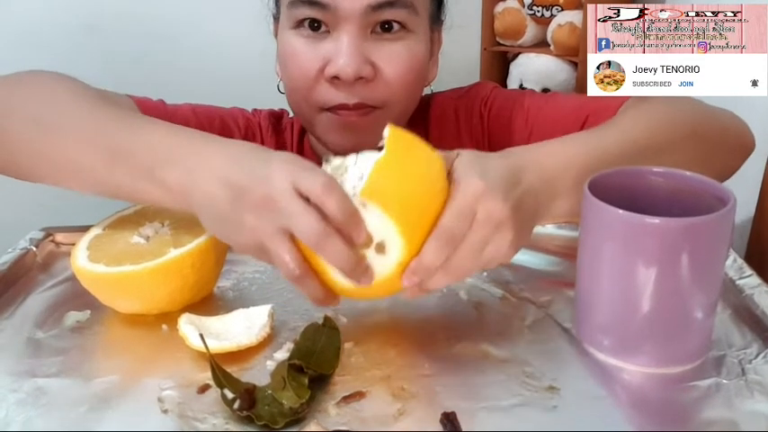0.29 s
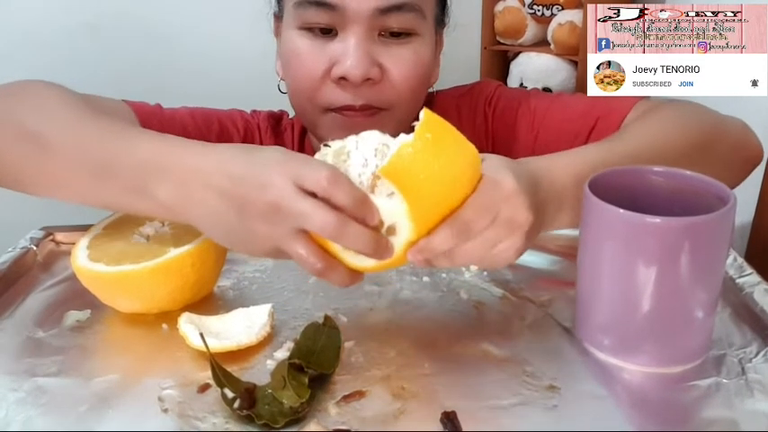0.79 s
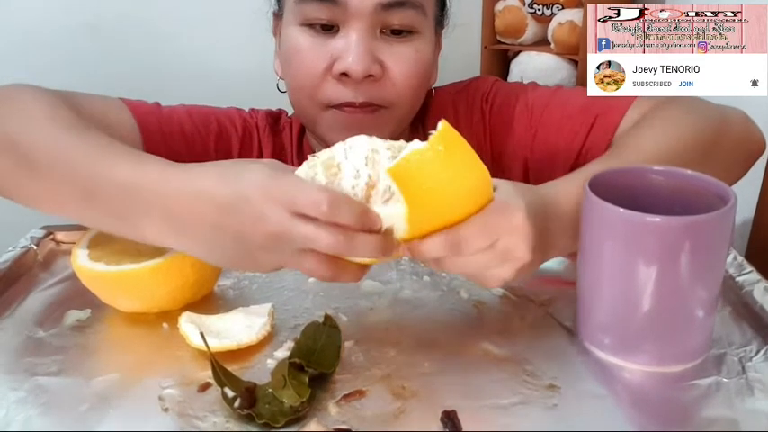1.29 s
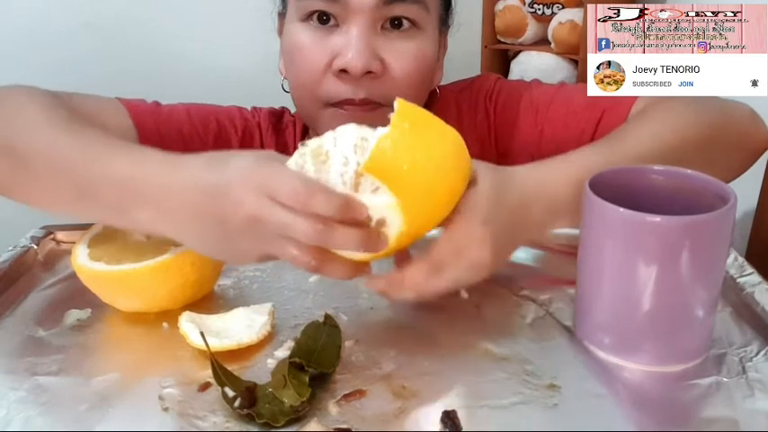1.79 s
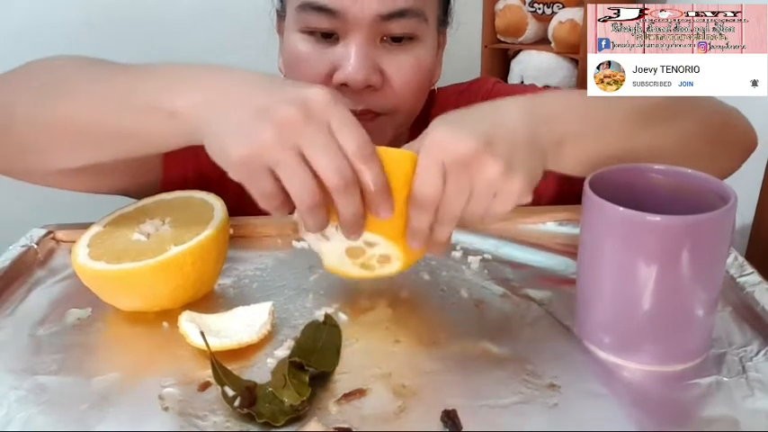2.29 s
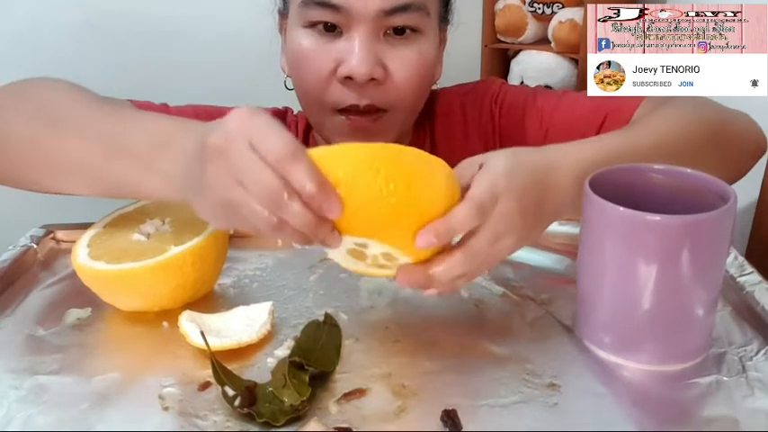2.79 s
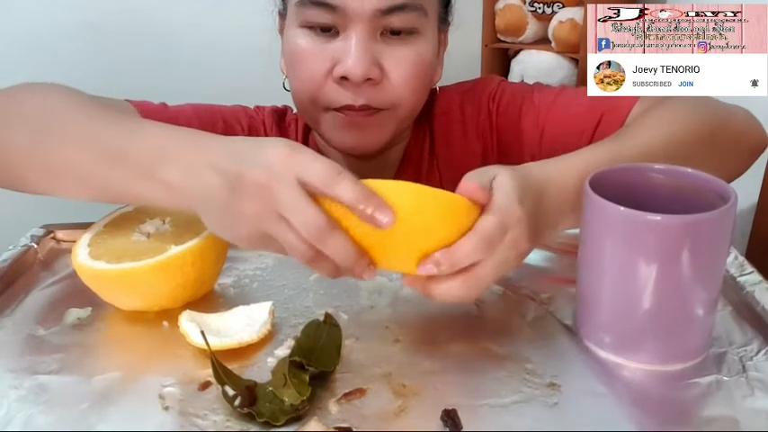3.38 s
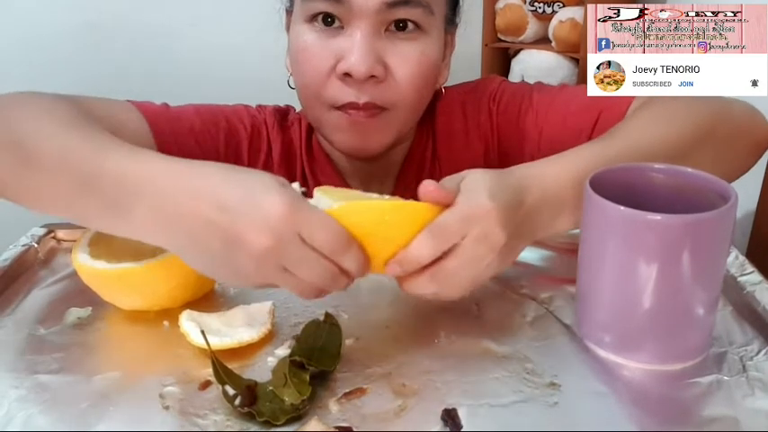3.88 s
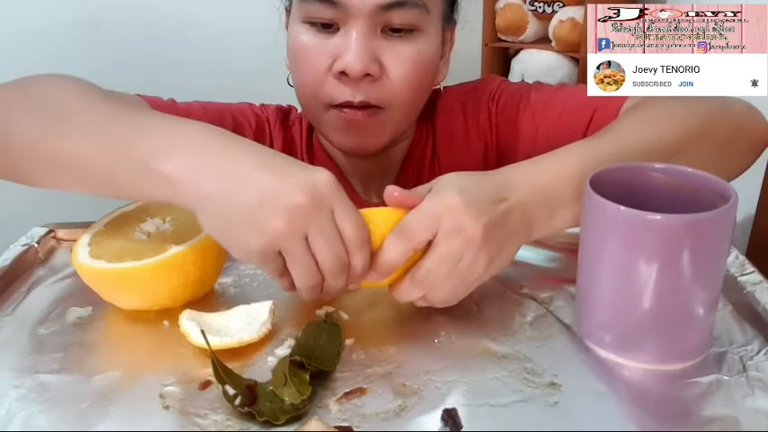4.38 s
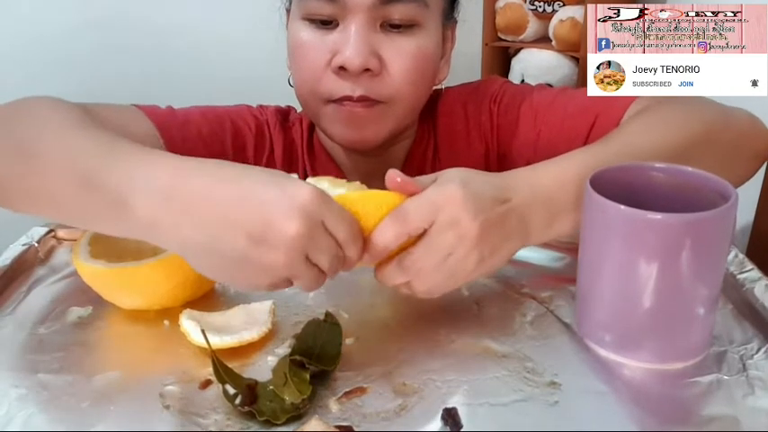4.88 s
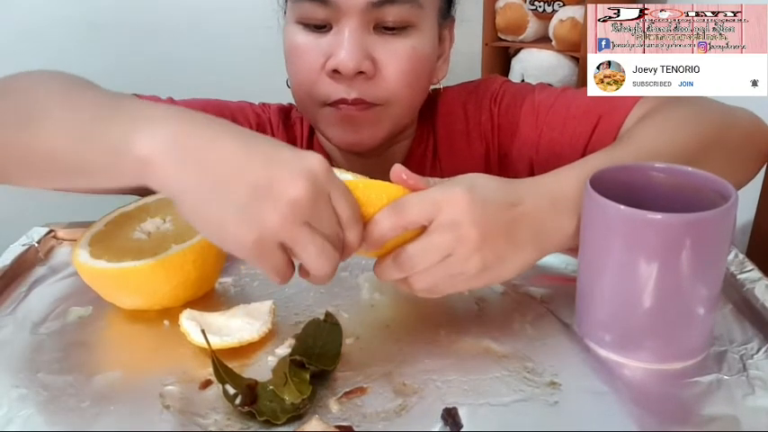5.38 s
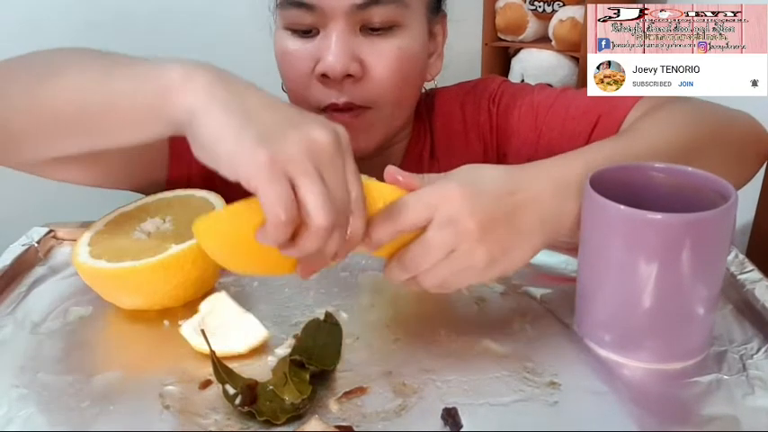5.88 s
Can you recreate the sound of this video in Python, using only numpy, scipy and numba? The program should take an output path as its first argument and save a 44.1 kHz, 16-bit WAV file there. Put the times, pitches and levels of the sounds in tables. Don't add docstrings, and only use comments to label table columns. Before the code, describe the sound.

Thick citrus peel is ripped apart by hand close up, with sharp dry cracks, gritty tearing crackles and a heavy double thump on a tray.

```python
import sys
import numpy as np
from scipy import signal
from scipy.fft import rfft, irfft
from scipy.io import wavfile
from scipy.ndimage import uniform_filter1d
from numba import njit

SR = 44100
rng = np.random.default_rng(int(sys.argv[2]) if len(sys.argv) > 2 else 0)


def transcribe(signal):
    frames = np.atleast_2d(signal).T
    limited = np.clip(frames, -1, 1)
    pcm = np.round(limited * 32767).astype(np.int16)
    wavfile.write(sys.argv[1], SR, pcm)


def volts(x):
    e = np.asarray(x, float) / 20
    return 10 ** e


N = 269892
TIME = np.arange(N) / SR

# (time [s], level [dB], width [s])
RUMBLE_SWELLS = [
    (-.05, -37, 0.033),
    (.9, -68, 1),
    (1.701, -72, 0.13),
    (3.802, -74, 0.22),
    (4.96, -87, 0.17),
    (5.76, -59, 0.12),
]
RUMBLE_DB = -71.5
# (frequency [Hz], density [dB per Hz])
HISS_SPECTRUM = [(94, -33), (160, -2.5), (339, -6), (419, -8), (528, -7), (855, -10.5), (1190, -10.5),
                 (3490, -13.5), (3920, -13.5), (5600, -14.5), (7300, -7.5), (9000, -16), (13500, -10.5),
                 (16000, -13.5)]
HISS_DB = -62

# (time [s], level [dB], best-excited frequency [Hz], spread [octaves], foil rattle [dB])
BLOWS = [(.001, -35.5, 222, 0.36, -62), (0.02, -47, 58.6, 0.41, -47), (0.831, -53, 240, 1.5, -50),
         (1.06, -50.5, 139, 0.53, -50), (2.1432, -17.5, 253, 0.53, -33), (2.1504, -15, 114, 1.6, -42.5),
         (2.156, -18.5, 410, 0.72, -38), (2.193, -30.5, 144, 0.29, -28), (2.269, -33.5, 59.6, 0.2, -45),
         (2.359, -52.5, 533, 0.2, -35), (3.525, -58, 140, 0.23, -50.5), (3.562, -49, 250, 0.27, -50),
         (3.599, -41, 135, 0.15, -46), (3.66, -53.5, 75, 0.49, -48), (4.873, -56.5, 460, 0.55, -63),
         (5.52, -67, 100, 0.67, -55), (5.675, -48.5, 80, 0.93, -47), (5.72, -52, 237, 0.18, -45),
         (5.803, -65, 101, 0.57, -40)]
# (frequency [Hz], level [dB], t60 [s])
TRAY_MODES = [(53.4, -7, 0.66), (65.1, -9.5, 0.26), (73, -15, 0.13), (100, 0.5, 0.21), (114.7, 0.5, 0.14),
              (136.4, -9, .3), (166.7, -11, 0.098), (253, -13.5, 0.13), (317, -16, 0.052), (329, -2, 0.073),
              (437, -28.5, 0.071), (460, -16, 0.14), (498.5, 0.5, 0.086), (642, -3, 0.1), (826, 0, 0.14),
              (950, -13, 0.2), (1235, -25.5, 0.14), (1494, -23, 0.089), (1950, -29, 0.11)]

# (time [s], length [s], level [dB], low edge [Hz], high edge [Hz])
PITH_PATCHES = [
    (.001, .04, -62, 6000, 8500),
    (2.627, 0.092, -38, 3970, 14600),
    (3.132, 0.035, -47, 5030, 14800),
    (3.357, 0.06, -48, 4200, 14900),
    (3.903, 0.011, -35, 7000, 15070),
    (4.398, 0.14, -56.5, 1210, 2020),
    (5.361, .06, -53, 2560, 3400),
    (5.631, 0.044, -37, 1130, 3280),
]
PITH_FALL_DB_PER_S = 306

# (time [s], frequency [Hz])
GAP_TUNING = [(.4, 2926), (.62, 2396), (.75, 2226), (.85, 1950), (1.25, 1930), (1.42, 2400), (1.6, 2760),
              (2.15, 1765), (2.6, 2548), (4.2, 2590), (4.3, 1792), (4.36, 1714), (4.37, 2480), (4.85, 2512),
              (5.4, 3035), (5.615, 4000), (5.66, 3605)]
GAP_Q, GAP_WIDTH_HZ = 5., 440.
GAP_POP = 2
GAP_FLICKER_DB = 3.
# (time [s], peak [dB], burst t60 [s], gap ring [dB], flesh [dB])
GAP_SNAPS = [(0.4134, -42, 0.016, -12, -24), (0.435, -22.5, 0.0053, -14, -32),
             (0.4995, -26, 0.034, -22, -38), (0.57, -24, 0.016, -14, -13), (0.6168, -46, 0.015, 8.5, -28),
             (0.6415, -24.5, 0.018, -17, -20), (0.7078, -26, 0.016, -38, -11),
             (0.749, -19, 0.0086, 2, -27), (.7585, -26.5, 0.013, 3, -28), (.786, -25, 0.011, -7, -33),
             (0.8364, -35, 0.0075, 4, 10.5), (0.8542, -28.5, 0.0055, 17, 10.5),
             (0.8667, -38, 0.0087, 6, -30), (.912, -49, .008, 0, -20), (0.992, -38, 0.013, -6, -27),
             (1.036, -31.5, 0.027, -32, -1.5), (1.1024, -31.5, 0.036, -20, -29),
             (1.1324, -32.5, 0.0099, 10.5, 13), (1.143, -40, .012, 10, -9),
             (1.2261, -30, 0.012, 18.5, -22), (1.237, -45, 0.014, 9, -10), (1.251, -42, 0.011, -1, -11),
             (1.2972, -29.5, 0.018, -7, -18), (1.4134, -33, 0.006, -7, -13),
             (1.453, -35.5, 0.063, -12, -29.5), (1.514, -41, 0.049, -32, -39.5),
             (2.1475, -46, 0.042, 0, 32), (2.1904, -32, 0.012, -19.5, -7),
             (3.523, -14.5, 0.038, -29, -5), (3.6058, -11.5, 0.15, -26, -6), (4.022, -29, 0.046, -7, -11),
              (4.3114, -43, 0.011, 12.5, -29), (4.3686, -24.5, 0.018, -5.5, -9.5),
              (4.388, -35, .01, 1.5, -30), (4.41, -36, .006, -8, -14.5), (4.43, -32.5, 0.016, -2.5, -43),
              (4.451, -26.5, 0.02, -3, -39), (4.513, -19, 0.016, -38, -14),
              (4.522, -29.5, 0.0094, 0.5, -37), (4.541, -41.5, 0.012, 8.5, -34),
              (4.6987, -34, 0.01, -2, -32), (4.9646, -26, 0.02, -26, 2), (5.3987, -24, 0.069, -21, -26),
              (5.5915, -39, 0.011, -20, 8.5), (5.6156, -15, 0.008, 2.5, -18),
              (5.6541, -13.5, 0.0074, -1.5, -20), (5.886, -38, 0.032, -15, -31),
              (5.963, -42.5, 0.0063, 4, 3)]
# (time [s], peak [dB], burst t60 [s], depth [dB])
SKIN_SNAPS = [(1.2097, -36, 0.0085, -19), (1.321, -24, 0.075, -11), (1.544, -7.5, 0.023, -51),
              (1.5496, -7.5, .03, -44), (1.56, -16, 0.037, -36), (1.7037, -22, 0.0043, -38),
              (1.843, -52, .006, -34), (1.9775, -57, .006, -43), (2.0213, -49, 0.0076, -44.5),
              (2.624, -44, .024, -29), (3.141, -46, 0.018, -34.5), (3.3632, -42.5, 0.063, -35),
              (3.4245, -25.5, 0.085, -46), (3.4382, -7.5, 0.075, -59), (3.442, -8.5, 0.07, -50),
              (3.452, -10.5, 0.061, -50), (3.5621, -28, .03, -34), (3.567, -8, 0.017, -20),
              (3.585, -13, 0.011, -30), (3.636, -13, 0.022, -32), (3.667, -11.5, 0.036, -25),
              (3.673, -4, 0.066, -32), (3.679, -3, 0.098, -26), (3.699, -8.5, 0.034, -31),
              (3.71, -10, 0.055, -26), (3.9096, -14, 0.03, -50), (3.988, -24.5, 0.13, -44),
              (4.1664, -36, 0.013, -19),
              (4.2194, -45, 0.0092, -34), (4.226, -34, 0.0084, -29), (4.2497, -24, 0.011, -28),
             (4.268, -18, 0.017, -42), (4.29, -18, .008, -27), (4.5747, -33.5, 0.072, -37),
             (4.661, -34, 0.0092, -30), (4.6939, -51, 0.08, 9), (4.8498, -32, 0.02, -30),
             (4.8726, -35, 0.11, -11), (4.938, -10.5, 0.086, -27), (4.9709, -19, 0.0085, -23),
             (4.978, -3.5, 0.041, -19), (5.1136, -21, 0.014, -37), (5.131, -25.5, 0.027, -25),
             (5.2479, -41.5, 0.044, 3.5), (5.2785, -31.5, 0.059, -30), (5.3582, -28.5, 0.069, -14),
             (5.4508, -16.5, 0.063, -33), (5.513, -24.5, 0.031, -44.5), (5.557, -36, .015, -20),
             (5.6235, -16.5, 0.009, -22), (5.6738, -16, 0.01, -2), (6.0042, -38, 0.22, -37),
             (6.102, -34.5, 0.053, -23)]
SKIN_HZ, SKIN_RING_DB, SKIN_FLESH_DB = 4530, -2, -7.5

# (start [s], length [s], start level [dB], end level [dB], depth [dB])
PULLS = [(0.417, 0.1, -54.5, -49.5, -9.5), (0.521, 0.17, -48, -50.5, -6.5),
         (0.689, 0.059, -46.5, -46.5, -2.5), (0.753, 0.065, -47, -47.5, -1),
         (0.845, 0.018, -47, -48.5, 8), (0.861, 0.016, -52, -48.5, 9.5),
         (0.894, 0.12, -59, -52, -3.5), (1.025, 0.14, -50, -48, 1), (1.132, 0.0086, -48, -47, 6.5),
         (1.169, 0.045, -61, -43.5, -11), (1.222, 0.036, -47.5, -54.5, 10.5),
         (1.271, 0.037, -47, -44.5, 0), (1.347, 0.47, -52.5, -63, -6),
         (1.542, 0.019, -24, -33, -30.5), (1.595, 0.14, -46.5, -45, -27),
         (1.71, 0.016, -41.5, -52, -25), (1.732, 0.049, -69, -48.5, -15.5),
         (1.944, 0.18, -64.5, -61.5, -26), (2.156, 0.048, -44.5, -48, 0),
         (2.627, 0.015, -55, -44, -38), (2.65, 0.094, -48, -52, -37), (3.119, 0.028, -69, -52, -33),
         (3.315, 0.072, -78.5, -47.5, -56), (3.448, 0.011, -32.5, -29.5, -9.5),
                (3.501, 0.017, -40, -33, -5.5), (3.562, 0.1, -22, -22.5, -9),
                (3.601, 0.11, -25.5, -22.5, -9.5), (3.822, 0.048, -56.5, -52, -11),
                (3.911, 0.014, -34, -40, -43), (3.932, 0.12, -62, -47.5, -2), (4.115, 0.16, -63, -53, -17),
                (4.214, 0.073, -35.5, -33, -26), (4.368, 0.084, -57, -43.5, -10.5),
                (4.5, 0.039, -47, -43, -11), (4.593, 0.12, -59.5, -55.5, -12),
                (4.692, 0.041, -54.5, -50.5, -3.5), (4.77, 0.1, -57, -57, -26),
                (4.86, 0.084, -53.5, -47, -13), (4.97, 0.028, -31, -27.5, -10.5),
                (5.072, 0.084, -51, -42.5, -19.5), (5.244, 0.067, -45, -49.5, -16.5),
                (5.358, 0.11, -40, -49, -14.5), (5.454, 0.15, -43, -44, -15.5),
                (5.623, 0.058, -36.5, -34.5, -3), (5.885, 0.16, -50, -59.5, -20),
                (6.078, 0.047, -63, -42, -18)]
BREAK_REACH_S = .02
RELEASE_DB_PER_S, DEEP_RELEASE_DB_PER_S = 281, 334.5
RIP_FROM_DB, RIP_DAMPS = -44, 0.29
FLESH_UNDER_GAP_DB, FLESH_SHARE = -11, 0.53
PATCH_EDGES_HZ = [300, 3500, 6500, 10000, 20000]
PATCHY_DB = 1.6

# (frequency [Hz], density [dB per Hz])
FIBRE_SPECTRUM = [(1060, -67), (1800, -13), (2400, -15), (3120, -0.5), (4940, 4), (5600, 3.5), (6240, 3),
                  (7340, 5), (8870, 0.5), (10900, 2.5), (15500, -10)]
# (time [s], level above 9 kHz [dB])
BRIGHTNESS = [(.4, -1.5), (1.3, 7.5), (1.55, 8.5), (1.9, 0), (3.5, -4), (3.8, 0.5), (3.95, 3), (4.2, -3),
              (4.9, -2.5), (5.1, -3), (5.6, -0.5), (6.1, 5)]
LEFT_TREBLE_DB = 1
# (time [s], left minus right [dB])
HAND_SIDE = [(0.4, 0.5), (0.86, -1), (1.24, -2), (1.45, -1), (1.54, 0.5), (1.75, -3.5), (1.85, 0),
             (3.14, 0.5), (3.22, 0.5), (3.93, -1.5), (4.9, -0.6), (5.12, -1.5), (5.72, -0.5), (6.12, -1)]
# (time [s], cancelled share [0-1])
TRAY_MIRROR = [(.4, 0.06), (.9, 0.2), (1.2, 0.6), (1.45, 0), (1.55, 0.3), (1.7, 0.1), (2.7, 0.66),
               (3.4, 0.24), (3.6, 0), (4.2, .3), (4.6, 0.9), (5.0, 0.13), (5.3, 0.4), (5.6, 0.67),
               (5.65, 0.4), (6.0, 1)]
NOTCH_HZ, NOTCH_WIDTH_HZ = 3600, 600

# (time [s], hum level [dB])
CUP_CLOSURE = [
    (1.4, -49),
    (1.55, 12.5),
    (1.7, -18),
    (5.3, -34.5),
    (5.37, 4),
    (5.43, 3),
    (5.45, 4),
    (5.5, 4),
    (5.58, -8),
    (5.63, -38.5),
]
CUP_HZ, CUP_WIDTH_HZ = 796, 39

# (time [s], level [dB], width [s])
SLIDES = [
    (1.72, -64.5, 0.017),
    (1.82, -71, 0.044),
    (2.07, -67, 0.11),
    (3.0, -72.5, 0.064),
]

# (time [s], level [dB], hold [s])
GROANS = [
    (3.444, -51.5, 0.155),
    (3.608, -34, 0.084),
]
GROAN_RISE_DB_PER_S, GROAN_SAG_DB_PER_S, GROAN_FALL_DB_PER_S = 670, 161, 265

# (frequency [Hz], t60 [s], echo against direct sound [dB])
WALLS = [(300, .26, -4), (1200, .24, -2), (3000, .22, -1), (7000, .2, -1), (13000, .16, -2)]
PORT_LAG = 13
STAND_LEAK_HZ = 16
PEAK_CEILING = 1.1


def unit(x):
    return x / np.sqrt(np.mean(x ** 2, axis=-1, keepdims=True))


def decay(t, t60):
    return np.exp(-np.log(1000) * t / t60)


def swell(s, width_s):
    return np.exp(-.5 * ((TIME - s) / width_s) ** 2)


def follow(points):
    return np.interp(TIME, *np.transpose(points))


def wobble(shape, samples):
    return unit(uniform_filter1d(rng.standard_normal(shape), samples))


def band(x, lo_hz, hi_hz):
    return signal.sosfilt(signal.butter(2, [lo_hz, min(hi_hz, .49 * SR)], "band", fs=SR, output="sos"), x)


def colour(x, points):
    hz, db = np.transpose(points)
    size = 2 ** 11
    log_hz = np.log(np.fft.rfftfreq(size, 1 / SR) + 1)
    cepstrum = irfft(np.log(volts(np.interp(log_hz, np.log(hz), db))))
    cepstrum[1:size // 2] *= 2
    cepstrum[size // 2 + 1:] = 0
    taps = irfft(np.exp(rfft(cepstrum)))
    taps = np.atleast_2d(taps / np.linalg.norm(taps))
    return signal.oaconvolve(x, taps, axes=1)[:, :x.shape[1]]


@njit
def ring(x, hz, width):
    y, b, l = np.empty(len(x)), 0., 0.
    for i in range(len(x)):
        g, k = np.tan(np.pi * hz[i] / SR), width / hz[i]
        v = (b + g * (x[i] - l)) / (1 + g * (g + k))
        b, l, y[i] = 2 * v - b, l + 2 * g * v, k * v
    return y


def ring_ports(ports, hz, width):
    return np.array([ring(port, np.full(N, 1. * hz), 1. * width) for port in ports])


def crackle(shape, per_s, scatter_db):
    happens = rng.random(shape) < per_s / SR
    strength = volts(scatter_db * np.minimum(rng.exponential(size=shape), 4))
    return unit(happens * strength * rng.standard_normal(shape))


def place(rows, times):
    out = np.zeros(N + rows.shape[1])
    starts = (np.array(times)[:, None] * SR).astype(int)
    np.add.at(out, starts + np.arange(rows.shape[1]), rows)
    return out[:N]


def background():
    mid, side = unit(band(rng.standard_normal((2, N)), 32.0, 97.5))
    swells = sum(volts(db) * swell(s, width_s) for s, db, width_s in RUMBLE_SWELLS)
    rumble = (mid + 0.5 * np.outer([1, -1], side)) * np.hypot(volts(RUMBLE_DB), swells)
    hiss = unit(colour(rng.standard_normal((2, N)), HISS_SPECTRUM))
    return rumble + hiss * volts(wobble(N, 5000)) * volts(HISS_DB - 1.5)


def tray():
    s, db, best_hz, spread, foil_db = np.transpose(BLOWS)
    hz, mode_db, t60 = (c[:, None] for c in np.transpose(TRAY_MODES))
    t = np.arange(SR // 2) / SR
    rows = []
    for best, wide in zip(best_hz, spread):
        level_chance, tuning_chance = rng.standard_normal((2, len(hz), 1))
        reach = np.exp(-.5 * (np.log2(hz / best) / wide) ** 2)
        strength = reach * volts(mode_db + 0.88 * level_chance)
        modes = -strength * decay(t, t60) * np.sin(2 * np.pi * hz * (1 + 0.02 * tuning_chance) * t)
        buzz = band(rng.standard_normal(len(t)), best / 2 ** wide, best * 2 ** (1.8 * wide)) * decay(t, 0.23)
        buzz = volts(-18.5) / buzz[:SR // 20].std() * buzz
        rows.append(modes.sum(axis=0) + buzz)
    stilled = np.clip((.33 - t) / 0.045, 0, 1) * np.clip(t / 0.002, 0, 1)
    rattle = band(crackle((len(s), len(t)), per_s=5500, scatter_db=-7.0), 2500, 13000)
    foil = rattle * decay(t, .08) * volts(foil_db)[:, None]
    return place((np.array(rows) * stilled + foil) * volts(db)[:, None], s)


def pith():
    out = 0
    for s, length, db, lo_hz, hi_hz in PITH_PATCHES:
        after = np.maximum(TIME - s - length, 0)
        level = volts(db - PITH_FALL_DB_PER_S * after) * (TIME > s)
        grains = crackle((2, N), per_s=18000, scatter_db=1)
        sizzle = band(band(grains, lo_hz, hi_hz), lo_hz, hi_hz)
        out = out + unit(sizzle) * level
    return out


def hollow(x, hz, width):
    return ring(ring(x, hz, width), hz, width)


def snap_rows():
    s, db, t60, gap_db, flesh_db = np.transpose(GAP_SNAPS)
    deep = [s, db, t60, np.interp(s, *np.transpose(GAP_TUNING)), gap_db, flesh_db]
    s, db, t60, depth_db = np.transpose(SKIN_SNAPS)
    pocket_hz = np.full(len(s), 1. * SKIN_HZ)
    skin = [s, db, t60, pocket_hz, depth_db + SKIN_RING_DB, depth_db + SKIN_FLESH_DB]
    return np.hstack([deep, skin])


def snaps():
    s, db, t60, hz, gap_db, flesh_db = snap_rows()
    t = np.arange(4096) / SR
    shared, left, right = crackle((3, len(s), len(t)), per_s=30000, scatter_db=1.5)
    crack = 0.28 * decay(t, 0.0013) * np.cos(2 * np.pi * 7000 * t) + 0.46 * decay(t, 0.00029)
    crack = crack * volts(-.6 * np.clip(db + 27, 0, 30))[:, None]
    envelope = np.clip(t / 0.00033, 0, 1) * decay(t, np.clip(t60, .004, .3)[:, None])
    pop = GAP_POP * decay(t, 0.0024) * volts(db - 9.0)[:, None]
    ports = []
    for own in (left, right):
        burst = (crack + (0.5 * shared + own) * envelope) * volts(db - 5.0)[:, None]
        gap = np.array([hollow(row, np.full(len(t), f), f / GAP_Q) for row, f in zip(burst + pop, hz)])
        gap = gap * volts(gap_db + 23.5)[:, None]
        flesh = band(place(burst * volts(flesh_db + 12.0)[:, None], s), 828, 1600)
        ports.append([place(burst, s), place(gap, s), flesh])
    return np.swapaxes(ports, 0, 1)


def tear_curves():
    power = np.full((3, N), 1e-12)
    breaks = snap_rows()[0]
    for s, length, start_db, end_db, depth_db in PULLS:
        to_break = breaks[np.argmin(abs(breaks - s))] - s
        if abs(to_break) < BREAK_REACH_S:
            s, length = s + to_break, max(length - to_break, 0)
        now = slice(int(s * SR), int((s + length) * SR) + SR // 4)
        t = TIME[now] - s
        after = np.maximum(t - length, 0)
        db = np.interp(t, [0, max(length, 1 / SR)], [start_db, end_db])
        fibre_db = db - RELEASE_DB_PER_S * after
        deep_db = db - DEEP_RELEASE_DB_PER_S * after
        rip_db = max(max(start_db, end_db) - RIP_FROM_DB, 0)
        gap_db = deep_db + depth_db - RIP_DAMPS * rip_db
        flesh_db = deep_db + FLESH_SHARE * depth_db + FLESH_UNDER_GAP_DB
        power[:, now] += volts(np.array([fibre_db, gap_db, flesh_db])) ** 2
    return 10 * np.log10(power)


def tear(fibre_db, gap_db, flesh_db):
    common, left, right = crackle((3, N), per_s=11000, scatter_db=2.2)
    flutter = volts(2.4 * wobble(N, 260))
    grains = unit(0.7 * common + np.array([left, right])) * flutter
    hz = follow(GAP_TUNING)
    gap = unit(np.array([hollow(port, hz, GAP_WIDTH_HZ) for port in grains]))
    gap = gap * volts(GAP_FLICKER_DB * wobble(N, 900) + 2.5)
    fits = volts(PATCHY_DB * wobble((len(PATCH_EDGES_HZ) - 1, N), 500))
    ranges = zip(PATCH_EDGES_HZ, PATCH_EDGES_HZ[1:], fits)
    patchy = unit(sum(band(grains, lo, hi) * fit for lo, hi, fit in ranges))
    flesh = unit(band(grains, 706, 2000))
    return patchy * volts(fibre_db + 7), gap * volts(gap_db + 3), flesh * volts(flesh_db + 5.0)


def brighten(x):
    low = signal.sosfilt(signal.butter(1, 9000, fs=SR, output="sos"), x)
    treble_db = follow(BRIGHTNESS) + LEFT_TREBLE_DB * np.array([[1], [-1]])
    return low + (x - low) * volts(treble_db)


def mirror(peel):
    dip = np.clip(follow(TRAY_MIRROR), 0, 1)
    return peel - dip * ring_ports(peel, NOTCH_HZ, NOTCH_WIDTH_HZ)


def cup_hum(flesh):
    return volts(follow(CUP_CLOSURE)) * ring_ports(flesh, CUP_HZ, CUP_WIDTH_HZ) * 2


def brush():
    rub = unit(band(crackle((2, N), per_s=4600, scatter_db=2.5), 300, 1100))
    return rub * sum(volts(db) * swell(s, width_s) for s, db, width_s in SLIDES)


def squeeze():
    lumps = unit(band(crackle(N, per_s=5100, scatter_db=0.5), 340, 1030))
    grip = 0
    for s, db, hold in GROANS:
        t = TIME - s
        rise = GROAN_RISE_DB_PER_S * np.maximum(-t, 0)
        sag = GROAN_SAG_DB_PER_S * np.clip(t, 0, hold)
        fall = GROAN_FALL_DB_PER_S * np.maximum(t - hold, 0)
        grip = grip + volts(db - rise - sag - fall)
    return lumps * grip


def room(x):
    t = np.arange(SR // 2) / SR
    hz = np.array(WALLS)[:, 0]
    edges = np.r_[hz[0] / 2, np.sqrt(hz[1:] * hz[:-1]), 2 * hz[-1]]
    noise, echo = rng.standard_normal((2, len(t))), np.zeros((2, len(t)))
    for (_, t60, db), lo, hi in zip(WALLS, edges, edges[1:]):
        shape = decay(t, t60) * np.clip(t / 0.006, 0, 1)
        echo += band(noise, lo, hi) * shape / np.linalg.norm(shape) * volts(db)
    echo[0, 0] = echo[1, PORT_LAG] = 1
    return signal.oaconvolve(x, echo / 2, axes=1)[:, :N]


def stand(thump):
    left = volts(-1.2) * signal.lfilter(*signal.butter(1, STAND_LEAK_HZ, "high", fs=SR), thump)
    return np.array([left, np.roll(thump, shift=7)])


def scene():
    fibre, gap, flesh = (a + b for a, b in zip(snaps(), tear(*tear_curves())))
    flesh = flesh + cup_hum(flesh)
    peel = brighten(colour(fibre, FIBRE_SPECTRUM)) + gap + flesh + pith()
    peel = mirror(peel * volts(np.outer([.5, -.5], follow(HAND_SIDE))))
    thump = tray() + squeeze()
    return room(peel + volts(-21.0) * thump) + stand(thump) + background() + brush()


def low_pass(x):
    return signal.sosfilt(signal.butter(12, 16650, fs=SR, output="sos"), x)


def record(dry):
    low = signal.butter(4, 46, "high", fs=SR, output="sos")
    top = signal.ellip(6, .5, 36, 15600, fs=SR, output="sos")
    rounded = PEAK_CEILING * np.tanh(dry / PEAK_CEILING)
    mix = signal.sosfilt(np.r_[low, top], rounded)
    return low_pass(mix)


dry = scene()
out = record(dry)
transcribe(out)
```